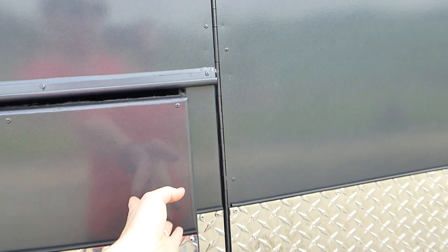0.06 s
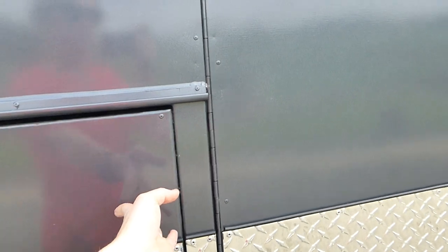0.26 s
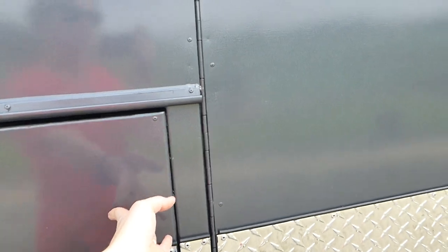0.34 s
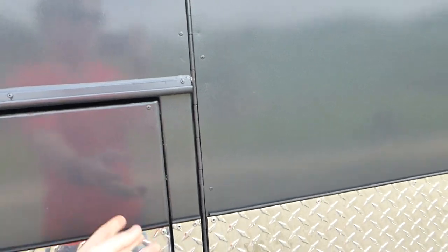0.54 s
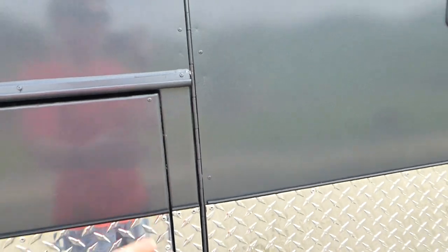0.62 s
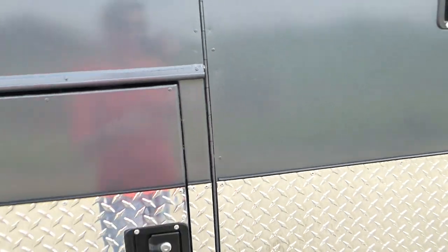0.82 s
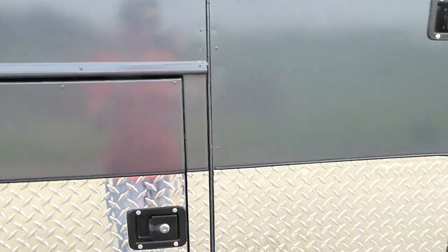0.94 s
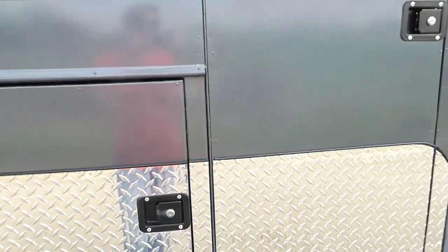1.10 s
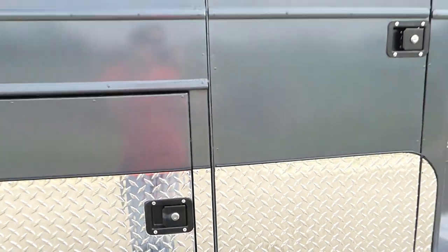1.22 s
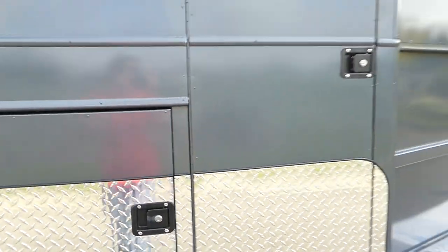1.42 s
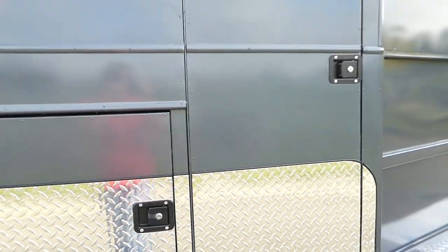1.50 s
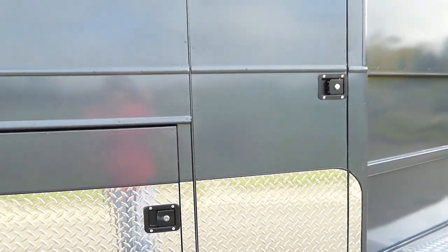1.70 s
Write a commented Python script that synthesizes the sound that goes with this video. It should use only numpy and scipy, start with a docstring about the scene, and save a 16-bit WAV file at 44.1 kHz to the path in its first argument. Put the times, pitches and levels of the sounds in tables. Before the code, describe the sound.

A metal compartment door on a vehicle is pushed shut close to the microphone, with a sharp latch strike and a brief panel boom. A few faint clicks follow, over light wind and a faint insect outdoors.

```python
"""Vehicle compartment door, shut outdoors

Close to the microphone, a metal door in a vehicle's side is pushed shut: the latch strikes, the door hits
its frame, the sheet panel booms and the catch rattles home; the surroundings answer dully. Light wind
rumbles on the microphone, with swells of rustling, soft hollow tones and a chirping insect around it.
A few faint clicks follow the slam; far off, a bird whistles and a machine hum fades in."""
import sys
import numpy as np
from scipy import signal
from scipy.fft import rfft, irfft, next_fast_len
from scipy.io import wavfile
from scipy.ndimage import map_coordinates

SR = 44100
rng = np.random.default_rng(int(sys.argv[2]) if len(sys.argv) > 2 else 0)


def put_to_file(sound):
    """Save the sound as 16-bit audio at rate SR, in the file named by the first command-line argument."""
    columns = np.atleast_2d(sound).T  # one column per channel
    safe = np.clip(columns, -1, 1)
    whole_steps = np.round(safe * 32767)
    wavfile.write(sys.argv[1], SR, whole_steps.astype(np.int16))


N = 77175

# spectra of the open air, treble and mid rustle, and wind on the microphone: f/Hz, relative level/dB
AIR_SPECTRUM = [(25, -36), (50, -27.5), (95, -9.5), (170, -4), (330, -3.5), (450, -9.5), (650, -15.5),
                (1500, -18.5), (3500, -24.5), (7000, -31.5), (9000, -29), (12000, -39), (15500, -42.5)]
RUSTLE_TREBLE = [(900, -24), (2300, 1.5), (4200, -1.5), (7000, -7.5), (10500, -10.5), (15500, -19.5)]
RUSTLE_MIDS = [(100, -13), (250, -8.5), (440, 6.5), (620, 1), (1000, 2.5), (1600, -1.5), (2200, -3.5),
               (4000, -33)]
BUFFET_SPECTRUM = [(25, -32), (55, -21.5), (90, -2), (125, -2), (220, -10.5), (500, -44.5)]
# stereo width of the air, the buffeting and the door: f/Hz, side minus mid/dB
AIR_WIDTH = [(60, -12), (180, -14.5), (550, -3), (1650, -4), (4970, -7.5), (15000, -7)]
BUFFET_WIDTH = [(60, -5), (200, -10)]
DOOR_WIDTH = [(60, -45), (280, -60.5), (600, -14.5), (1500, -5), (4000, -11), (12000, -10.5)]
# swells of rustling: t/s, width/s, treble level/dB, mid level/dB
RUSTLES = [(0.01, 0.023, -42.5, -42.5), (.11, 0.093, -55.5, -50), (.168, 0.0086, -57, -70),
           (.815, 0.038, -52.5, -51.5), (0.876, 0.058, -49.5, -52), (0.959, 0.062, -57.5, -46.5),
           (1.18, 0.046, -64.5, -53), (1.342, 0.093, -54.5, -51.5), (1.5, 0.035, -52.5, -52),
           (1.558, 0.044, -47, -44), (1.651, 0.033, -50, -43)]
# gusts at the microphone: t/s, level/dB
GUSTS = [(0, -67), (.3, -63.5), (.5, -59), (.78, -68), (.87, -49.5), (1.0, -54.5), (1.28, -65.5),
         (1.43, -53), (1.55, -85), (1.75, -54)]
# insect chirps: t/s, top f/Hz, level/dB
CHIRPS = [(.075, 9570, -59), (.158, 9570, -58), (.325, 9100, -63.5), (0.409, 9080, -66),
          (.487, 8930, -66.5), (0.569, 8950, -64.5), (.655, 8710, -63.5), (.743, 8730, -63),
          (0.827, 8960, -70), (.918, 8950, -61.5), (1.003, 9025, -58), (1.073, 9300, -58.5),
          (1.156, 9280, -59.5), (1.249, 8900, -64), (1.336, 9000, -71), (1.41, 8900, -65),
          (1.483, 9070, -65), (1.725, 9400, -67)]
# hollow swells and far-off bird notes: t/s, width/s, f/Hz, level/dB
HOLLOWS = [(.14, .02, 314.7, -51.5), (0.846, 0.0069, 220, -47.5), (.96, 0.023, 393, -50),
           (1.22, 0.077, 350, -52.5), (1.301, 0.01, 352, -42), (1.636, 0.014, 391, -43),
           (1.689, 0.021, 363, -44.5)]
BIRD_NOTES = [(.587, .012, 1710, -57.5), (1.15, .025, 2430, -65), (1.24, 0.0049, 4500, -59)]
# door contacts: t/s, latch ring/dB, frame clank/dB, crack/dB, panel boom/dB
CONTACTS = [(0.238, 3.5, -12, -15, -19.5), (0.2539, -4, -16, -20.5, -29), (0.2559, -27, -5.5, -20, -17),
            (0.2977, -51.5, -29, -69, -42), (0.3015, -28, -29, -40.5, -58), (0.3111, -26, -18, -31.5, -27)]
# small clicks: t/s, ring/dB, snap/dB, frame clank/dB, panel knock/dB, left minus right/dB
CLICKS = [(0.475, -53, -53, -43, -75, 4.5), (0.657, -44.5, -39, -56.5, -71, -6.5),
          (1.6695, -22.5, -36.5, -35.5, -46, -8)]
# modes of the steel latch, door frame, sheet panel and clicks: f/Hz, relative level/dB, t60/s
LATCH_MODES = [(2976, -16.5, .025), (3220, -14, 0.039), (3640, -0.5, 0.013), (3860, -7.5, .016),
               (4640, -17.5, .03), (5040, -17, .028), (5540, -18, .025), (6400, -17.5, .008),
               (7150, -20.5, 0.021), (8637, -19.5, .02), (9590, -32.5, 0.022), (10770, -27, .028)]
FRAME_MODES = [(1097.5, -12, 0.055), (1480, -15.5, 0.079), (1543, -5, .028), (1583, -5.5, 0.046),
               (1834, -18.5, 0.053), (2186, -13, .04)]
PANEL_MODES = [(104.4, -24.5, 0.61), (168.9, -24, 0.42), (223.2, -17, 0.31), (284.9, -1.5, 0.28),
               (287.4, 2, 0.16), (343, -7, .33), (365.6, -8.5, .35), (413.3, -11, 0.46), (460, -2.5, 0.25),
               (514, -12, .28), (664, -10.5, 0.28), (790, -8, 0.18), (849, -15.5, 0.26), (1068, -9, .14),
               (1073, -13.5, 0.136), (1186, -14, 0.27)]
CLICK_MODES = [(1780, -2, 0.0073), (2900, -2.5, 0.013), (4040, -16, .015), (5830, -6.5, 0.0072),
               (9100, -13, 0.0069)]
# spectra of the bolt's slide, contact crack, panel clatter, echo and click snap: f/Hz, relative level/dB
SLIDE_SPECTRUM = [(300, -3), (2000, -6), (3800, -1), (6000, -9), (7500, -20.5), (9500, -16.5),
                  (12000, -29.5)]
CRACK_SPECTRUM = [(100, -28), (400, -11.5), (1200, -6), (2000, -11.5), (3300, -1), (5500, -2),
                  (7000, -10.5), (10500, -7.5), (13000, -14.5), (16000, -21.5)]
CLATTER_SPECTRUM = [(30, -46), (70, -24), (120, -9.5), (210, -2), (320, 1), (550, -2.5), (1000, -3),
                    (1700, -11), (2400, -14.5), (5000, -26), (14000, -40.5)]
ECHO_SPECTRUM = [(50, -21), (120, 7), (250, -2.5), (400, -10), (550, -21.5), (2000, -32.5), (8000, -44.5)]
SNAP_SPECTRUM = [(200, -12.5), (1000, -8.5), (2300, -2.5), (5000, -8.5), (7500, -12), (10000, -15.5),
                 (12000, -27), (16000, -26)]
# decay times of the crack, clatter, echo and snap: f/Hz, t60/s
CRACK_T60 = [(300, 0.13), (1500, 0.12), (4000, 0.038), (14000, 0.019)]
CLATTER_T60 = [(100, 0.94), (400, .38), (1000, .2), (2000, .18), (5000, 0.149), (12000, 0.11)]
ECHO_T60 = [(100, 1), (400, .75), (4000, .5)]
SNAP_T60 = [(1000, 0.033), (10000, 0.021)]

LATCH_RISE_S, FRAME_RISE_S, PANEL_RISE_S = 0.00017, 0.00078, 0.025


def amp(db):
    """Decibels to gain."""
    return 10 ** (np.asarray(db) / 20)


def along(points, hz):
    """A curve of (frequency, value) points read on a log axis."""
    freqs, values = np.transpose(points)
    return np.interp(np.log(hz + 1), np.log(freqs + 1), values)


def since(s):
    """Seconds since s, zero before."""
    return np.maximum(np.arange(N) / SR - s, 0)


def swell(s, width):
    """A bell-shaped rise and fall around s."""
    return np.exp(-.5 * ((since(0) - s) / width) ** 2)


def wobble(rate):
    """A smooth random curve, rate knots a second."""
    knots = rng.standard_normal(int(N * rate / SR) + 4)
    steps = np.arange(0, N, 16)
    return np.interp(np.arange(N), steps, map_coordinates(knots, [steps * rate / SR]))


def pan(db):
    """Gains that set the left channel db above the right."""
    return amp(np.array([[db], [-db]]) / 2)


def filtered(x, response):
    """x shaped by a gain that depends on frequency."""
    size = next_fast_len(N + SR // 2)
    return irfft(rfft(x, size) * response(np.fft.rfftfreq(size, 1 / SR)), size)[..., :N]


def noise(spectrum, width):
    """Coloured mid-side noise as a left-right pair of rms 1."""
    def gains(hz):
        mid_db = along(spectrum, hz)
        return amp([mid_db, mid_db + along(width, hz)])
    mid, side = filtered(rng.standard_normal((2, N)), gains)
    stereo = np.array([mid + side, mid - side])
    return stereo / np.sqrt(np.mean(stereo ** 2) + 1e-20)


def tone(hz):
    """A sine of rms 1 that follows a pitch curve."""
    return np.sqrt(2) * np.sin(2 * np.pi * np.cumsum(hz) / SR)


def burst(s, spectrum, t60, rise_s):
    """Countless overtones struck at s: noise with each frequency dying at its own speed."""
    hz, t, bands = signal.stft(noise(spectrum, DOOR_WIDTH), SR, nperseg=128)
    fade = amp(-60 * np.maximum(t - s, 0) / along(t60, hz)[:, None])
    attack = 1 - np.exp(-since(s) / rise_s)
    return signal.istft(bands * fade, nperseg=128)[1][:, :N] * attack


def ring(s, modes, rise_s, flutter_rad=0.6, build_s=0.14):
    """Modes struck at s; loose sheet metal wavers as it fades."""
    t = since(s)
    flutter = flutter_rad * np.minimum(t / build_s, 1)
    ringing = sum(amp(db - 60 * t / t60) * np.sin(2 * np.pi * hz * t + flutter * wobble(60))
                  for hz, db, t60 in modes)
    return ringing * (1 - np.exp(-t / rise_s))


def wind(air_db=-50.5, sway_db=1.46, grain_db=1.43):
    """Steady open air all around, under swells of fine-grained rustling."""
    treble = np.sqrt(sum((amp(db) * swell(s, width)) ** 2 for s, width, db, _ in RUSTLES))
    mids = np.sqrt(sum((amp(db) * swell(s, width)) ** 2 for s, width, _, db in RUSTLES))
    grain = amp(grain_db * wobble(300))
    rustle = treble * noise(RUSTLE_TREBLE, AIR_WIDTH) + mids * noise(RUSTLE_MIDS, AIR_WIDTH)
    air = amp(air_db + sway_db * wobble(3.2)) * noise(AIR_SPECTRUM, AIR_WIDTH)
    return grain * rustle + air


def buffeting(lump_db=3):
    """Light gusts rumble right on the microphone."""
    times, levels = np.transpose(GUSTS)
    gust_db = np.interp(since(0), times, levels) + lump_db * wobble(22)
    return amp(gust_db) * noise(BUFFET_SPECTRUM, BUFFET_WIDTH)


def insect(half_width_s=0.011, arch_hz=556, rough_hz=280, rasp_db=3.5):
    """Thin raspy chirps in the background, each an arch in pitch."""
    out = np.zeros(N)
    for s, top_hz, db in CHIRPS:
        arch = np.minimum(((since(0) - s) / half_width_s) ** 2, 10)
        envelope = amp(db + rasp_db * wobble(250)) * np.exp(-arch)
        out += envelope * tone(top_hz - arch_hz * arch + rough_hz * wobble(1000))
    return out


def hollow_swells(flicker_db=3, waver_hz=16):
    """Brief, soft, wavering low tones in the background."""
    return sum(amp(db + flicker_db * wobble(90)) * swell(s, width) * tone(hz + waver_hz * wobble(150))
               for s, width, hz, db in HOLLOWS)


def bolt_slide(start_s=.223, length_s=.015, level_db=-45.5):
    """Close up, the bolt rides over its striker just before the door hits."""
    t = since(0)
    sliding = (t > start_s) & (t < start_s + length_s)
    return amp(level_db) * noise(SLIDE_SPECTRUM, DOOR_WIDTH) * sliding


def door(spike_db=1.5, spike_s=.0016, clatter_db=-6.5):
    """Close to the microphone, each contact rings the steel latch, the frame and the sheet panel."""
    out = np.zeros((2, N))
    for s, latch_db, frame_db, crack_db, panel_db in CONTACTS:
        spike = 1 + amp(spike_db) * np.exp(-since(s) / spike_s)  # the crack's first instant stands out
        crack = burst(s, CRACK_SPECTRUM, CRACK_T60, LATCH_RISE_S) * spike
        latch = amp(latch_db) * ring(s, LATCH_MODES, LATCH_RISE_S) + amp(crack_db) * crack
        boom = ring(s, PANEL_MODES, PANEL_RISE_S)
        clatter = amp(clatter_db) * burst(s, CLATTER_SPECTRUM, CLATTER_T60, rise_s=0.002)
        clank = amp(frame_db) * ring(s, FRAME_MODES, FRAME_RISE_S)
        out += pan(db=1.6) * latch + clank + amp(panel_db) * (boom + clatter)
    return out


def outdoor_echo(slam, level_db=-33.5):
    """The surroundings send the slam back to the microphone, weak and dull."""
    tail = burst(0, ECHO_SPECTRUM, ECHO_T60, rise_s=.05)
    return amp(level_db) * signal.fftconvolve(slam, tail / np.linalg.norm(tail[0]), axes=1)[:, :N]


def clicks():
    """Light ticks to left and right, with a trace of the frame's clank and the panel's boom."""
    out = np.zeros((2, N))
    for s, ring_db, snap_db, frame_db, knock_db, pan_db in CLICKS:
        tick = amp(ring_db) * ring(s, CLICK_MODES, LATCH_RISE_S)
        snap = amp(snap_db) * burst(s, SNAP_SPECTRUM, SNAP_T60, LATCH_RISE_S)
        clank = amp(frame_db) * ring(s, FRAME_MODES, FRAME_RISE_S)
        knock = amp(knock_db) * ring(s, PANEL_MODES, PANEL_RISE_S)
        out += pan(pan_db) * (tick + snap) + clank + knock
    return out


def bird(waver_hz=12):
    """Short plain whistles from far off."""
    return sum(amp(db) * swell(s, width) * tone(hz + waver_hz * wobble(87))
               for s, width, hz, db in BIRD_NOTES)


def machine_hum(hz=161, level_db=-54.5, start_s=0.87, rise_s=0.17, waver_hz=2, waver_db=2.0):
    """A machine's hum fades in from the distance."""
    fade_in = np.minimum(since(start_s) / rise_s, 1)
    return amp(level_db + waver_db * wobble(10)) * fade_in * tone(hz + waver_hz * wobble(10))


def scene():
    """The door up close and its echo, over the outdoor background."""
    slam = bolt_slide() + door()
    foreground = slam + outdoor_echo(slam) + clicks()
    return foreground + wind() + buffeting() + hollow_swells() + machine_hum() + insect() + bird()


def record(dry, ceiling=.98, top_hz=15800):
    """Behind the microphone, the loudest peaks are squashed and the top of the band is cut steeply."""
    squashed = dry / (1 + np.abs(dry / ceiling) ** 6) ** (1 / 6)
    return filtered(squashed, lambda hz: 1 / np.sqrt(1 + (hz / top_hz) ** 160))


dry = scene()
out = record(dry)
put_to_file(out)
```